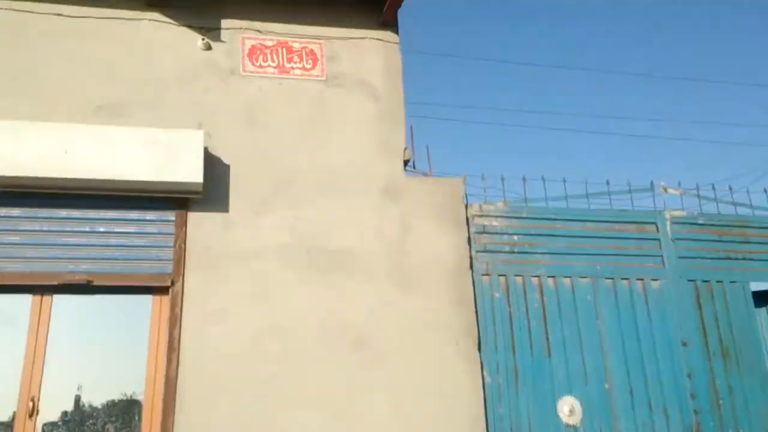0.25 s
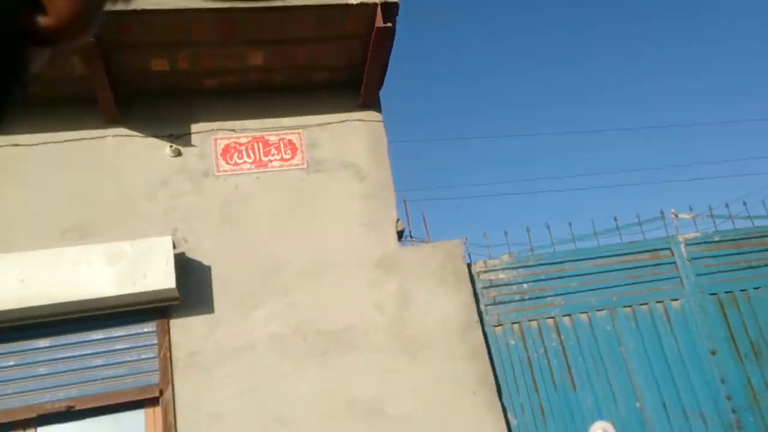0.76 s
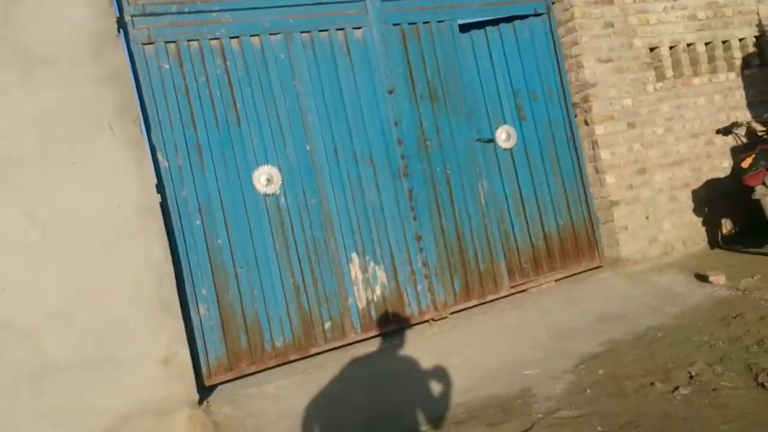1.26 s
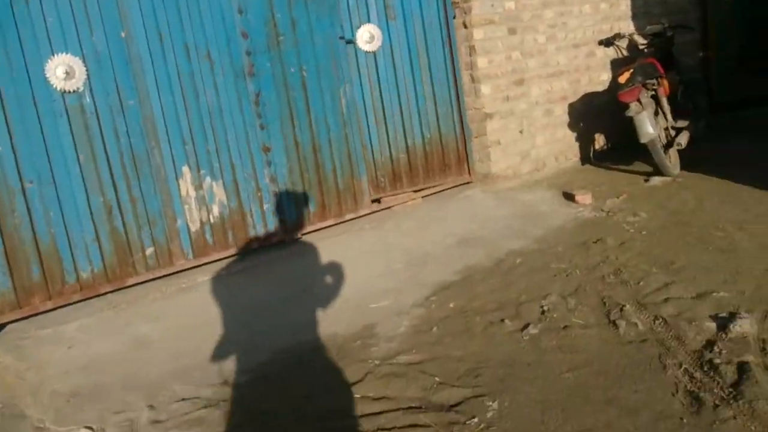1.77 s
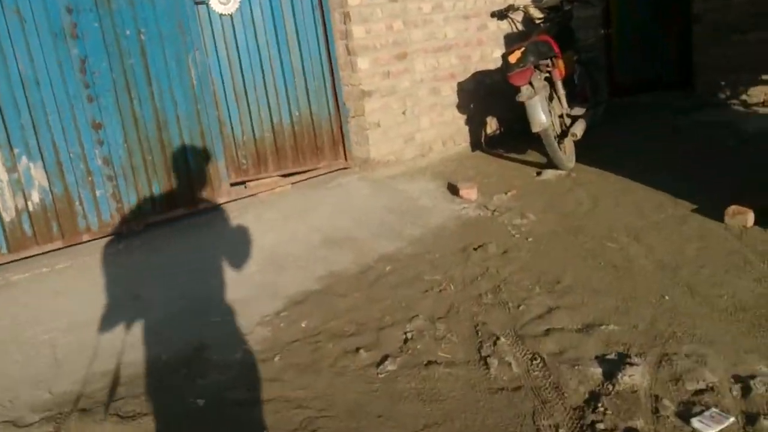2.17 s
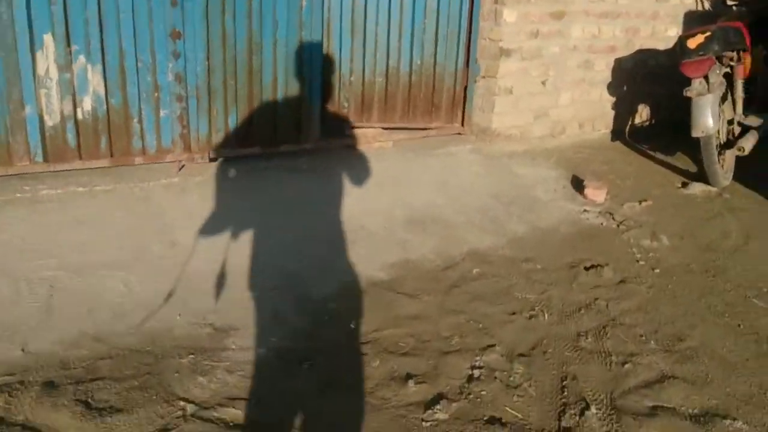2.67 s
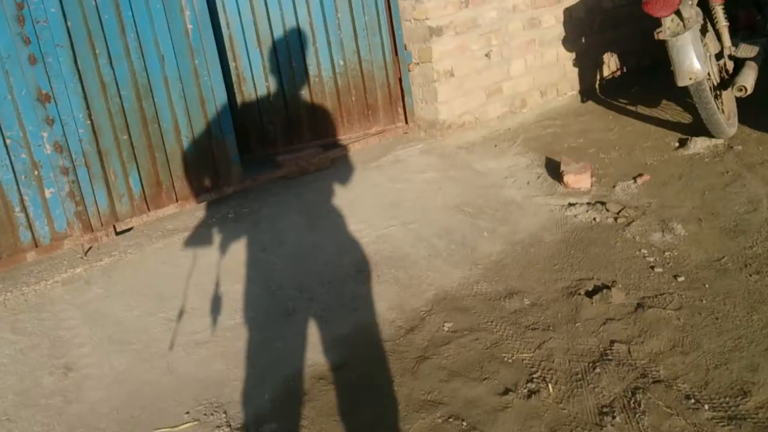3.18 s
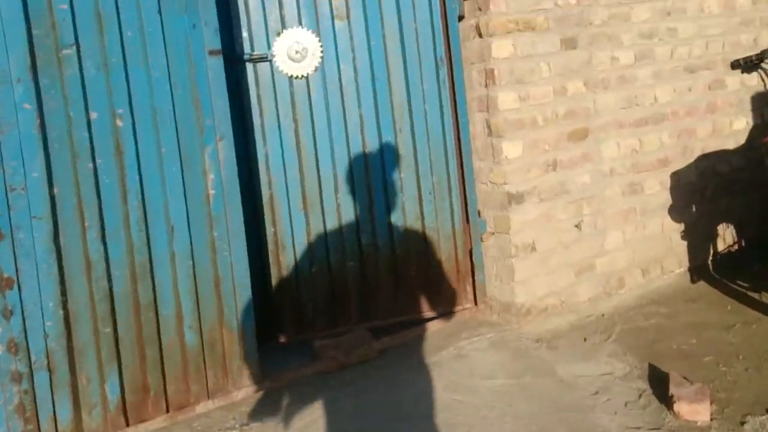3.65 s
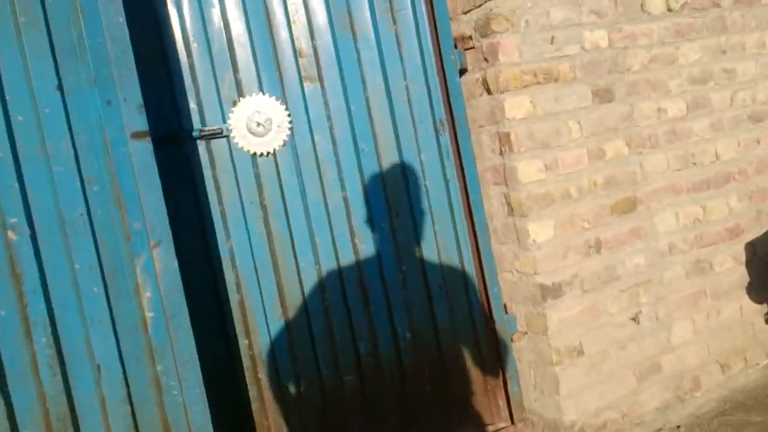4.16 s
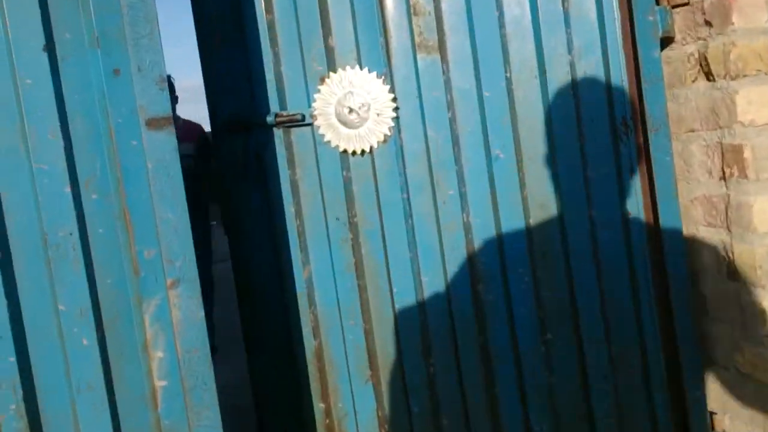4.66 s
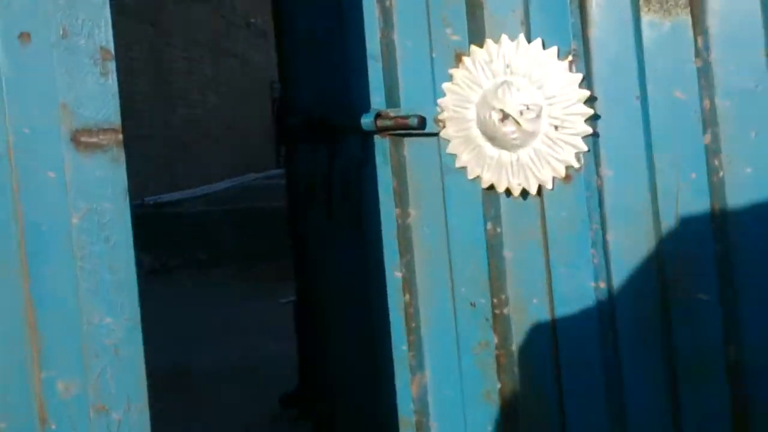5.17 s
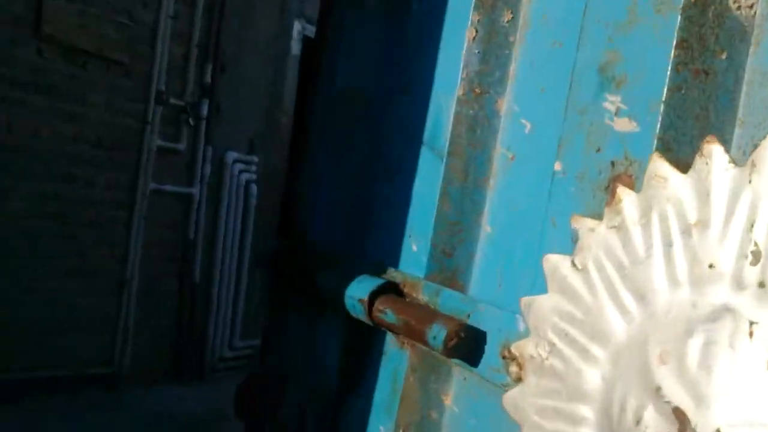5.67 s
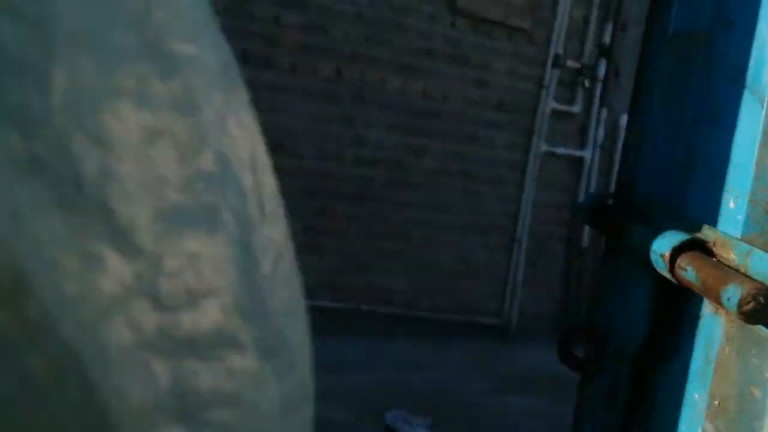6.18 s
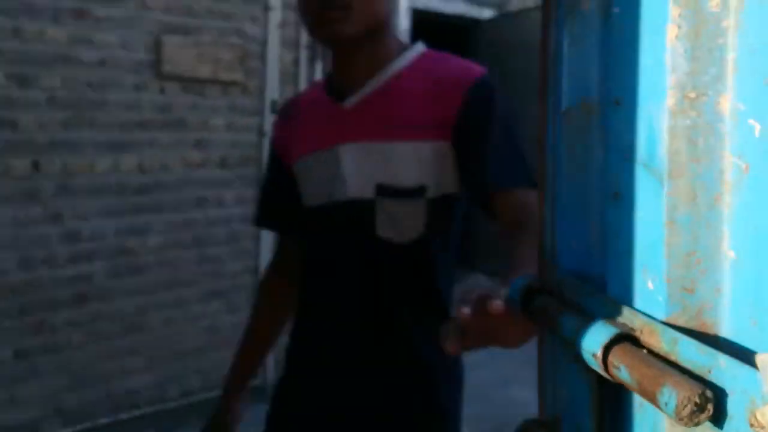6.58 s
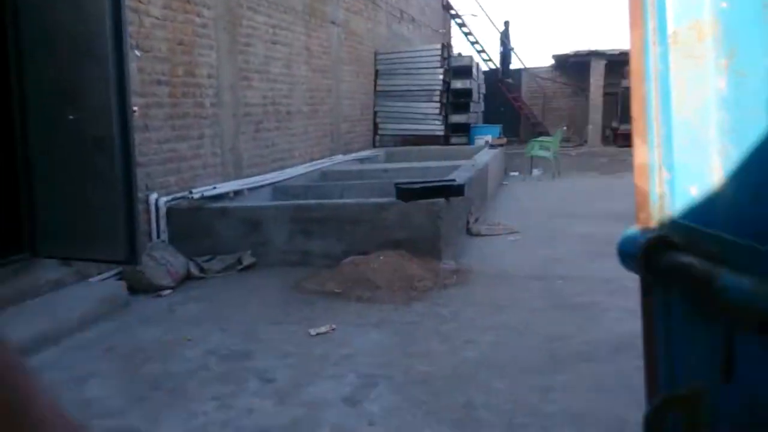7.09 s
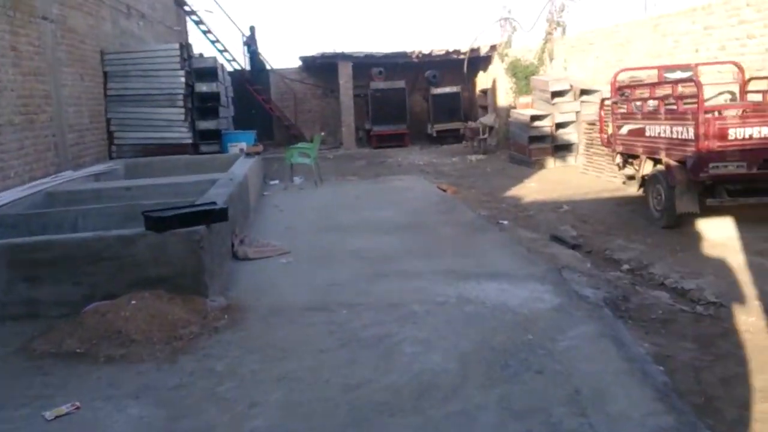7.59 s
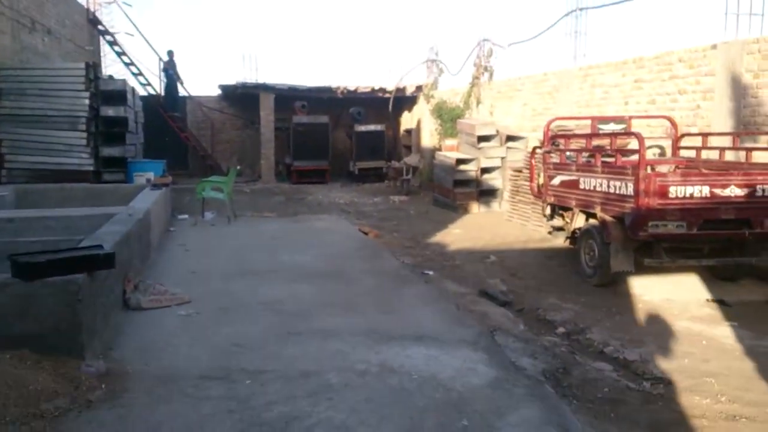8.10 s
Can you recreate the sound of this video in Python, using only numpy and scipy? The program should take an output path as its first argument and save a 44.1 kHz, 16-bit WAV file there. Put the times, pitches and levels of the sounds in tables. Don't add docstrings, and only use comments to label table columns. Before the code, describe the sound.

A multi-cylinder diesel runs steadily throughout, its quick uneven exhaust beats low and muffled behind a steel gate. From 0 to 0.5 s it is faint; fingers tap the phone case, loudest near 0.4, with fine sleeve rustle and soft wind buffeting mostly at left. Around 1.5 s there is a small rattle and heel thud; at 2.2 s a loud cloth flick with bright metallic jingle, then bumps. From 2.5 to 4.5 s the throb wavers with strides, with a sharp tick and rub at 3.8. From 4.7 to 5.5 s soles scrape and the exhaust gets stronger. At 6 s a heavy scuff and hard latch rattle hit, then a strong wind puff and deep thumps at 6.3, more scuffing until 6.9. After 7 s the phone clears the gate: clatter, hollow ringing pitches and fan hiss open out, loudest around 8 s, cutting off still running.

```python
import sys
import numpy as np
from scipy import signal
from scipy.fft import rfft, irfft, next_fast_len
from scipy.io import wavfile
from scipy.ndimage import uniform_filter1d

SR = 44100
rng = np.random.default_rng(int(sys.argv[2]) if len(sys.argv) > 2 else 0)


def file_out(sig):
    cols = np.atleast_2d(sig).T
    lim = np.clip(cols, -1, 1)
    pcm = np.round(lim * 32767).astype(np.int16)
    wavfile.write(sys.argv[1], SR, pcm)


def voltage_ratio(level):
    return 10 ** (np.asarray(level, float) / 20)


N = 367794

CYCLE_HZ = 12.69
PORT_LAG_S = 0.00025
THROB_LAG = 0.87
# t/s, lag/ms
CYCLE_LAG = [(0, 27.1), (3.3, 27.1), (3.7, 28.6), (5.7, 28.6), (6.3, 32.5), (7.3, 33.4), (8.34, 35.6)]
# t/s, heading left minus right/dB, palm over the left port/dB
PHONE_TURN = [(0, -16.5, 3), (.16, 9, 2), (.42, -10, 19), (.65, 3, 10), (1.11, 5, 23), (1.81, 5.5, 16),
              (2.37, 8.5, 23), (2.6, 5.5, 23), (3.32, 2, 13.5), (3.55, -5, 14), (3.95, -4, 16),
              (5.34, -1, 8), (5.87, -3.5, 6), (6.41, -5.5, 11), (7.55, 2, 5.5), (8.34, -1.5, 4)]
# f/Hz, level per Hz/dB
BLOCK_COLOUR = [(210, -36), (350, -10), (428, -26.5), (485, -3.5), (608, 4), (811, 6.5), (1000, 8.5),
                (1210, 2), (1660, -2.5), (2290, 2.5), (3140, -14), (4630, -9.5), (7000, -33), (9100, -26),
                (15400, -120)]
# t/s, echo delay/ms, echo share (0-1), line of sight through the gap/dB
GATE_PATH = [(0, 0.76, 0.7, -81), (.5, 0.57, 0.8, -100), (1.3, 0.61, 0.8, -76), (1.7, 0.61, 0.9, -81),
             (2.1, 0.64, 0.61, -94), (2.6, 0.53, 0.37, -81), (4.3, 0.6, 0.34, -55.5),
             (4.9, 0.67, 0.44, -47), (5.2, 0.77, 0.6, -44), (5.6, 1.63, 0.2, -36.5),
             (6.1, 0.67, 0.1, -40.5), (6.45, 1.19, 0.55, -34.5), (6.71, 0.12, 0, -41),
             (6.75, 0.33, 0, -35.5), (7.0, 0.6, 0, -29), (7.3, 0.15, 0.01, -23), (8.15, 0.14, 0.02, -21),
             (8.34, 0.35, 0.32, -26.5)]


def rms1(x):
    return x / np.sqrt(np.mean(x ** 2))


def curves(table):
    s, *columns = np.transpose(table)
    return [np.interp(np.arange(N) / SR, s, c) for c in columns]


def bumps(times, sizes, width_s):
    t = np.arange(0, N, 64) / SR
    bells = np.exp(-.5 * ((t[:, None] - times) / width_s) ** 2)
    return np.interp(np.arange(N) / SR, t, bells @ sizes)


def colour(x, points, lo_hz=0, hi_hz=30000):
    hz, db = np.transpose(points)
    size = next_fast_len(N)
    f = np.fft.rfftfreq(size, 1 / SR) + 1
    gain = voltage_ratio(np.interp(np.log(f), np.log(hz), db))
    gain = gain / (1 + (lo_hz / f) ** 10) / (1 + (f / hi_hz) ** 10)
    return rms1(irfft(rfft(x, size) * gain, size)[..., :N])


def ring(x, hz, width):
    return signal.lfilter(*signal.iirpeak(hz, hz / width, SR), x)


def delay(x, seconds):
    return np.interp(np.arange(N) - seconds * SR, np.arange(N), x)


def patchy(x, db, size=1024):
    z = signal.stft(x, nperseg=size)[2]
    field = uniform_filter1d(rng.standard_normal(z.shape), size=6, axis=-2, mode="wrap")
    field = uniform_filter1d(field, size=4, axis=-1, mode="wrap")
    return signal.istft(z * voltage_ratio(db * rms1(field)), nperseg=size)[1][..., :N]


def chatter(db, per_s=40):
    size = int(SR / per_s)
    smooth = uniform_filter1d(rng.standard_normal(N), size=size)
    return voltage_ratio(db * rms1(uniform_filter1d(smooth, size=size)))


def pan(db):
    return voltage_ratio(np.array([db, -db]) / 2) / np.cosh(db * np.log(10) / 40)


def ports(direct, diffuse, share, lag_s=PORT_LAG_S):
    share = np.clip(share, 0, 1)
    both = np.array([direct, delay(direct, lag_s)])
    return np.sqrt(1 - share) * both + np.sqrt(share) * diffuse


def echoed(x):
    echo_ms, echo = curves(GATE_PATH)[:2]
    share = np.clip(echo, 0, 1)
    return np.array([c + share * delay(c, echo_ms / 1000) for c in x]) / np.sqrt(1 + echo ** 2)


def throb(lag):
    cycles = CYCLE_HZ * (np.arange(N) / SR - curves(CYCLE_LAG)[0] / 1000)
    return np.cos(2 * np.pi * (cycles - lag))


def levels():
    # t/s, block level/dB, exhaust level/dB, shade of the walker's body/dB
    approach = [(0, -42.5, -34.5, 45), (.3, -37, -36.5, 51), (.5, -35, -46, 34), (1.25, -37.5, -21, 27.5),
                (1.6, -33.5, -32.5, 17), (2.3, -33.5, -31, 7.5), (3.1, -33.5, -29.5, 4.5),
                (3.8, -33, -33, -1.5), (4.25, -33.5, -24, 3.5), (4.7, -31, -26, 4.5),
                (5.2, -29.5, -12, 5.5), (5.6, -28, -9, 5.5), (6.2, -26.5, -11, 5), (6.8, -27.5, -17.5, 3.5),
                (7.1, -24, -16.5, 2), (7.45, -20.5, -16, 1), (8, -15.5, -14.5, 4),
                (8.34, -17.5, -17.5, 1.5)]
    # t/s, swell of pipe/dB, of firing tone/dB, of silencer/dB
    strides = [(.25, 15, 8, 4.5), (1.2, -11.5, -10, -1), (1.68, 4, 7.5, -3), (2.28, 7.5, -10.5, 11.5),
               (2.791, 4.5, -1, 7), (3.319, 7, 9.5, 6), (3.85, 11.5, 11.5, 5), (4.5, 6.5, -10, 4.5),
               (4.74, 5, -14, 1), (4.95, -1.5, 5, 5), (5.43, -3, 0, -2), (6.201, 3.5, 11, 0),
               (6.55, 10.5, 10, 4.5), (6.97, 9.5, -9, 4.5), (7.4, 0, 9.5, -5.5), (8.08, -1.5, -1, -2)]
    stride_s = 0.12
    block_db, exhaust_db, shade_db = curves(approach)
    s, pipe_swell, tone_swell, silencer_swell = np.transpose(strides)
    swell = bumps(s, pipe_swell, stride_s)
    sight_db = curves(GATE_PATH)[2]
    return dict(
        rumble=block_db + 0.34 * swell,
        clatter=block_db + 7.5 + 0.19 * sight_db - 0.0074 * shade_db,
        hiss=block_db - shade_db,
        pipe=exhaust_db + swell,
        tone=-24.5 + 0.24 * exhaust_db + bumps(s, tone_swell, stride_s),
        silencer=-8.5 + 0.5 * block_db + 0.22 * exhaust_db + bumps(s, silencer_swell, stride_s))


def self_noise():
    cavity = [(5000, -21), (7800, -11), (10000, 3), (12000, -12), (15400, -13)]  # f/Hz, level/dB
    return voltage_ratio(-75.5) * colour(rng.standard_normal((2, N)), cavity)


def wind():
    # t/s, peak/dB, left minus right/dB
    puffs = [(.37, -27, 1), (.64, -31, 27), (.97, -27, 24), (1.21, -36, 3), (1.411, -30.5, 21),
             (1.6, -27, 6), (2.13, -23.5, 29), (2.6, -23, 4), (2.77, -27.5, 13), (3.41, -26, 18),
             (3.83, -27.5, 18.5), (4.09, -29, -16), (4.46, -36, 8), (4.88, -35, 5), (5.3, -36, 5),
             (5.46, -32, 26), (5.85, -29.5, 0), (6.14, -37, 12), (6.28, -11.5, 16), (6.53, -32, 20),
             (6.97, -20, -24), (7.23, -19, -6), (7.42, -22.5, -14), (8.05, -31, -6)]
    # f/Hz, level per Hz/dB
    gust = [(4, 9), (10, 23.5), (25, 12), (50, 12), (100, 18), (250, 3.5), (600, -53.5)]
    s, db, pan_db = np.transpose(puffs)
    breeze = voltage_ratio(-34) * pan(20.5)[:, None]
    gain = breeze + [bumps(s, g, 0.09) for g in voltage_ratio(db) * pan(pan_db)]
    air = patchy(rng.standard_normal((2, N)), db=5.2, size=2048)
    return voltage_ratio(2.1) * gain * colour(air, gust, lo_hz=6)


def brushes():
    # end t/s, length/s, level/dB, left minus right/dB
    strokes = [
        (.23, .07, -51.5, 25),
        (.33, 0.068, -66, 14),
        (.49, .06, -49, 17),
        (.65, .07, -63, 15),
        (.78, .015, -64, 14),
        (1.03, .08, -62, 13),
        (1.47, .07, -60, 4.5),
    ]
    # f/Hz, level per Hz/dB
    sleeve = [(4000, -25), (5500, -7), (7300, -13), (9500, 1.5), (12500, -5), (15400, -3)]
    t, gain = np.arange(N) / SR, np.zeros((2, N))
    for end, length, db, pan_db in strokes:
        start = 1 / (1 + np.exp(-np.clip((t - end + length) / .006, -50, 50)))
        slope_db = 40 * np.minimum(t - end, 0) - 900 * np.maximum(t - end, 0)
        gain += voltage_ratio(db + slope_db) * start * pan(pan_db)[:, None]
    return gain * colour(rng.standard_normal((2, N)), sleeve)


def scuffs():
    # t/s, level/dB, share of sole/dB, left minus right/dB
    flicks = [
        (0.87, -43, -25, 14.5),
        (1.473, -32, 0, 5),
        (1.735, -41, -7, -40),
        (2.201, -5.5, -3, 1.5),
        (4.702, -28, 9, -4),
        (4.912, -33.5, 15.5, -7),
        (5.04, -32, 4.5, -29),
        (5.482, -15, 1.5, -11),
        (6.427, -21, -4, -9),
        (6.723, -20, 8.5, -9),
    ]
    # t/s, level/dB, share of sole/dB, left minus right/dB
    rubs = [(1.466, -33, -5.5, -4), (1.846, -49.5, 8, -13), (2.072, -46, 5.5, 4), (2.6794, -48.5, 4, 2),
            (3.263, -54.5, 17, 9), (3.705, -53.5, 19, -18), (3.798, -29, -4, -21), (5.226, -26, -7, -32),
            (5.73, -21.5, 1, -14), (5.999, -5, -2.5, -12), (6.288, -25, 6.5, -13), (6.77, -40, -11, -13),
            (6.852, -13, 0.5, -8.5)]
    # f/Hz, level per Hz/dB
    cloth_right = [(2940, -33), (5000, -24), (5950, 16.5), (7450, 8.5), (7990, 9.5), (10800, 12.5),
                   (12300, -5.5), (15400, -6)]
    cloth_left = [(4000, -36), (5500, -14.5), (7500, -12), (9300, -7.5), (11000, -16), (13000, -20),
                  (15400, -15.5)]
    sole_right = [(500, -4), (1000, 2), (1600, 2.5), (2500, 8), (3300, -5.5), (4300, 15), (5500, 6.5),
                  (7000, -46.5)]
    sole_left = [(500, -14), (1000, -22), (1600, -12.5), (2500, -1), (3300, -8), (4300, -10), (5500, -18),
                 (7000, -35.5)]
    top, body = np.zeros((2, 2, N))
    rows = [(*r, 0.0091, 0.25) for r in flicks]  # hold/s, t60/s
    rows += [(*r, 0.068, 0.26) for r in rubs]
    for s, db, body_db, pan_db, hold, t60 in rows:
        first = int(s * SR)
        t = np.arange(N - first)[:SR // 2] / SR
        fade = voltage_ratio(-60 * np.maximum(t - hold, 0) / t60)
        shape = (1 - np.exp(-t / .007)) * fade * pan(pan_db)[:, None]
        top[:, first:][:, :len(t)] += voltage_ratio(db - 12.5) * shape
        body[:, first:][:, :len(t)] += voltage_ratio(db + body_db - 3.5) * shape
    rub = ports(rng.standard_normal(N), rng.standard_normal((2, N)), .4)
    left, right = patchy(rub, db=3.2, size=512)
    cloth = [colour(left, cloth_left), colour(right, cloth_right, lo_hz=4750)]
    sole = [colour(left, sole_left), colour(right, sole_right)]
    return top * cloth + body * sole


def clinks():
    # t/s, peak/dB, f/Hz, t60/s
    rattles = [(1.482, -20, 1600, 0.03), (1.474, -22, 1950, .04), (1.476, -28, 2680, 0.067),
               (1.48, -25, 1020, 0.17), (2.197, -16, 2580, 0.12), (2.212, -7.5, 4300, 0.048),
               (2.208, -10, 8300, 0.069), (2.204, -16, 11400, 0.2), (2.205, -25.5, 14600, .15),
               (2.211, -18, 9700, .1), (2.21, -17, 7000, .12), (2.225, -17, 1520, 0.21),
               (2.235, -22, 1100, 0.18), (2.255, -24, 1500, .03), (2.277, -24, 1450, .03),
               (2.298, -26, 1480, .05), (1.493, -24, 1650, .03), (2.23, -24.5, 680, 0.3),
               (6.011, -4, 3970, 0.037), (6.049, -10, 3900, 0.096), (6.089, -24, 4250, 0.088)]
    out = np.zeros((2, N))
    for s, db, hz, t60 in rattles:
        t = np.arange(int(t60 * SR)) / SR
        width = 7 * np.sqrt(hz)
        noise = rng.standard_normal((2, SR // 2))
        rattle = rms1(ring(ring(noise, hz, width), hz, width))[:, -len(t):]
        fade = voltage_ratio(db - 60 * t / t60) * (1 - np.exp(-t / 0.0018))
        out[:, int(s * SR):][:, :len(t)] += fade * rattle
    return out


def knocks():
    # t/s, upper peak/dB, lower minus upper/dB, left minus right/dB
    ticks = [(0.401, -47, -9, -15), (0.8769, -52, -3, 7), (1.734, -29.5, -26, -38), (1.7858, -45, -12, -30),
             (1.8144, -54, -2, -14), (1.8572, -36.5, 12.5, -32), (2.204, -20, -4.5, 1),
             (3.7987, -11.5, -40, -35), (4.711, -37, 3, 4), (5.493, -25, 10.5, -16), (5.8077, -35, -3, -6),
             (6.115, -20, 7, -24), (6.3615, -12.5, -9, 16), (6.5934, -47, 12, -16), (6.6718, -47, 2, -17),
             (6.736, -24, 9, -15), (5.252, -31, -8, -15), (5.295, -32, -5, -15), (5.76, -38, 8, -10),
             (6.312, -33, 0, -10), (6.432, -33, 0, -10), (6.62, -50, 0, -15), (7.385, -32, 8, -8),
             (7.4, -23, 14, -8), (1.016, -58, -10, 14), (.862, -64, 8, 10), (6.852, -32, 8, -7)]
    # t/s, peak/dB, f/Hz
    taps = [
        (0.3121, -7.5, 900),
        (.321, -15, 920),
        (0.369, -10, 690),
        (.393, -3.5, 402),
        (0.3998, -6.5, 910),
        (.4, -19.5, 2960),
        (.477, -24, 750),
    ]
    # t/s, peak/dB, f/Hz, t60/s
    thuds = [
        (1.563, -16.5, 176, 0.045),
        (2.23, -25.5, 352, 0.56),
        (2.269, -9.5, 150, 0.051),
        (2.312, -16, 274, 0.082),
        (2.739, -17.5, 152.6, 0.2),
        (3.849, -19.5, 151, 0.13),
        (1.853, -19, 200, 0.026),
        (5.075, -18, 327, 0.097),
        (6.105, -20, 44.3, 0.38),
        (6.362, -19, 43.6, 0.24),
    ]
    tick_cycles, blow_cycles = 2.8, .55
    rows = []
    for hz, rel_db in ((10070, -0.5), (7200, -6.0), (13800, -23.0), (5500, -7.0)):
        rows += [(s, db + rel_db, hz, .0045, p, tick_cycles) for s, db, _, p in ticks]
    rows += [(s + 0.001027, db + rel_db, 4200, .009, p, tick_cycles) for s, db, rel_db, p in ticks]
    rows += [(s, db, hz, 2.5 / hz, -22, blow_cycles) for s, db, hz in taps]
    rows += [(s, db, hz, t60, -1.5, blow_cycles) for s, db, hz, t60 in thuds]
    out = np.zeros((2, N))
    for s, db, hz, t60, pan_db, cycles in rows:
        t = np.arange(int(t60 * SR)) / SR
        contact = np.sin(np.pi / 2 * np.minimum(t * hz / cycles, 1)) ** 2
        blow = voltage_ratio(db + 10.0 - 60 * t / t60) * contact * np.sin(2 * np.pi * hz * t)
        out[:, int(s * SR):][:, :len(t)] += blow * pan(pan_db)[:, None]
    return out


def standing_waves():
    hums = [(1.097, 0.46, -42, 980, 130), (0.039, 0.3, -44.5, 905, 200), (.72, 0.24, -48, 1190, 100),
            (2.42, 0.16, -41, 2660, 200), (6.084, .55, -31, 338.6, 35), (6.67, 0.17, -30.5, 863, 70),
            (6.029, 0.27, -28, 960, 50), (0, .25, -55, 1980, 500), (1.594, .15, -47, 2140, 200),
            (2.901, .45, -30.5, 329, 25), (2.709, 1.31, -39, 956, 45.3), (5.549, .3, -30, 963, 45),
            (2.75, .3, -49, 1940, 90), (3.26, 0.067, -48, 2150, 200), (3.375, 0.21, -42, 1615, 70),
            (3.519, .55, -38, 2600, 170), (3.768, .18, -41, 1734, 60), (4.2, .2, -42, 1474, 60),
            (2.455, .2, -33.5, 407, 70.3), (3.951, .6, -31, 430, 71.6), (4.65, .45, -33, 333.3, 30),
            (4.88, 0.12, -33.5, 461, 50), (4.993, .27, -31, 1360, 170), (5.027, 0.23, -34.5, 1040, 200),
            (5.43, .1, -28, 1206, 140), (5.425, .12, -34, 1390, 80), (5.454, 0.25, -30.5, 610, 60),
            (6.6, .6, -29.5, 1458, 70), (6.6, .6, -26.5, 503, 40), (6.698, .4, -32.5, 654, 120),
            (7.111, .1, -28, 1048, 90), (7.259, .42, -23.5, 727, 110), (7.272, 0.77, -22.5, 806, 70.5),
            (7.56, 0.12, -32, 2250, 130), (7.9, .5, -34, 331.5, 40), (7.85, 0.52, -23.5, 1193, 109),
            (7.912, .3, -42.5, 2390, 152), (0.548, .2, -46, 630, 80), (1.45, 0.16, -37, 460, 83)]
    out = np.zeros((2, N))
    beat = throb(THROB_LAG)
    for s, length, db, hz, width in hums:
        near = slice(int(max(s - .4, 0) * SR), int((s + length + .4) * SR))
        t = np.arange(N)[near] / SR
        noise = rng.standard_normal(3 * SR)
        hum = rms1(ring(ring(noise, hz, width), hz, width))[-len(t):]
        throb_db = 7 * beat[near] / (1 + (hz / 550) ** 4)
        outside_s = np.maximum(0, np.maximum(s - t, t - s - length))
        gain = voltage_ratio(db + throb_db) * np.exp(-outside_s / 0.054)
        out[:, near] += gain * [hum, np.roll(hum, int(PORT_LAG_S * SR))]
    return out


def shell_sings():
    tones = [(4.694, 0.026, -20, 329), (4.955, 0.013, -14.5, 330), (4.993, 0.011, -15.5, 335),
             (5.321, 0.016, -23.5, 345), (6.34, 0.024, -13.5, 339), (6.56, 0.039, -16, 329.4),
             (6.62, .02, -19.5, 330), (7.555, 0.017, -13.5, 211), (7.771, 0.04, -13, 333.4),
             (8.022, 0.023, -16, 272), (8.083, 0.015, -16, 339), (8.123, 0.02, -14.5, 280),
             (8.174, 0.029, -17.5, 349), (8.3, 0.028, -14, 338), (2.35, 0.011, -15, 288),
             (2.428, .01, -16, 230), (1.61, 0.018, -20, 105), (6.265, 0.0087, -7.5, 150),
             (6.315, 0.015, -9, 200), (4.935, 0.0086, -10.5, 162), (5.012, .009, -9, 167),
             (4.46, .009, -10.5, 160)]
    out = np.zeros(N)
    for s, half, db, hz in tones:
        near = slice(int((s - .2) * SR), int((s + .2) * SR))
        t = np.arange(N)[near] / SR - s
        out[near] += voltage_ratio(db) * np.exp(-.5 * (t / half) ** 2) * np.sin(2 * np.pi * hz * t)
    return np.array([out, delay(out, PORT_LAG_S)])


def fan():
    heading, palm = curves(PHONE_TURN)
    air = patchy(ports(rng.standard_normal(N), rng.standard_normal((2, N)), .7), db=2.6)
    air = chatter(db=1.75) * (air + 0.8 * ring(air, 3540., 40.) + 0.07 * ring(air, 4200.0, 770.0))
    hiss = colour(air, BLOCK_COLOUR, lo_hz=3450, hi_hz=6000)
    return voltage_ratio(levels()["hiss"] + 2.5) * pan(heading - palm) * hiss


def block(cycles, diffuse, lag_s):
    # f/Hz, width/Hz, level/dB
    covers = [(458, 190, 0.5), (658, 7.3, -6), (796, 13, -2.5), (503, 13, 6.5), (1099, 8.1, -1.5),
              (1177, 18, -2), (1348, 10, -2.5), (1490, 19, 2), (1710, 35, -30), (2148, 20, -7),
              (2279, 23, -1), (2480, 26, 2), (3340, 53, -2)]
    turn = rng.standard_normal(3476)
    repeat = np.interp(cycles % 1, np.arange(len(turn)) / len(turn), turn)
    gate = 1 + 0.5 * np.exp(-(6 * cycles % 1) / 0.19)
    direct = gate * (.45 * repeat + rng.standard_normal(N))
    direct = patchy(direct, db=2.2, size=8192)
    both = ports(rms1(direct), rng.standard_normal((2, N)), diffuse, lag_s)
    rung = sum(voltage_ratio(db) * ring(both, hz, w) for hz, w, db in covers)
    return patchy(both + 1.2 * rung, db=3.5)


def exhaust(cycles):
    firings_db = [-1.4, 0, -3.4, -5.3, -4.6, -6.9]
    runners_ms = [1.2, 2.7, .6, 1.9, 0, -2.7]
    # f/Hz, width/Hz, level/dB, sign
    pipe_modes = [(82, 19, -26, -1), (125.5, 50, -5.5, -1), (140, 80, -5.7, 1), (180, 38, -15, -1)]
    # f/Hz, width/Hz, level/dB
    silencer_modes = [(274, 98, -5.5), (329.2, 19.4, 9), (427, 100, 2.5)]
    # f/Hz, level/dB
    boom = [(40, 7), (100, 2.5), (160, 3), (192, 8), (240, 2)]
    count = np.arange(int(6 * cycles[-1]))
    late, strong = rng.standard_normal((len(count), 2)).T
    at = np.interp(count / 6, cycles, np.arange(N))
    at = at + (np.take(runners_ms, count % 6) + .15 * late) * SR / 1000
    pulses = np.zeros(N)
    pulses[np.clip(at, 0, N - 1).astype(int)] = voltage_ratio(np.take(firings_db, count % 6) + 1.3 * strong)
    pulses = signal.sosfilt(signal.butter(4, 900, fs=SR, output="sos"), pulses)
    pipe_db, tone_db, silencer_db = map(levels().get, ("pipe", "tone", "silencer"))

    pipe = sum(sign * voltage_ratio(db) * ring(pulses, hz, w) for hz, w, db, sign in pipe_modes)
    pipe = colour(pipe, boom, hi_hz=227.0)
    pipe_throb = 1.5 * throb(0.14) * (0.5 - bumps([6.35], [1], .3))
    tone = rms1(ring(ring(pulses, 6 * CYCLE_HZ, 15.0), 6 * CYCLE_HZ, 14.0))

    outflow = [(60, 4), (150, 11.0), (330, -7.5), (500, -8.0), (900, -45.0)]  # f/Hz, level/dB
    gas = colour(rng.standard_normal(N), outflow)
    shell = rms1(sum(voltage_ratio(db) * ring(pulses + 0.028 * gas, hz, w) for hz, w, db in silencer_modes))
    shell = colour(shell, boom, lo_hz=204, hi_hz=560) + 0.4 * gas
    shell = voltage_ratio(silencer_db + 1) * patchy(shell, db=1.6, size=2048)

    mono = voltage_ratio(pipe_db - 2.5 + pipe_throb) * pipe + voltage_ratio(tone_db - 4.0) * tone
    mono = mono + voltage_ratio(0.5 * throb(THROB_LAG) - 1.4) * echoed([shell])[0]
    yard = voltage_ratio(silencer_db - 11.5) * colour(rng.standard_normal((2, N)), boom, lo_hz=208, hi_hz=600)
    return np.array([mono, delay(mono, PORT_LAG_S)]) * pan(-2.0)[:, None] + yard


def engine():
    # f/Hz, level per Hz/dB
    treble = [(3530, 27.5), (6000, 9), (7570, -13), (10200, -30.5), (12300, -53), (14400, -55),
              (15400, -58.5)]
    cycles = CYCLE_HZ * (np.arange(N) / SR - curves(CYCLE_LAG)[0] / 1000) + 1
    rumble_db, clatter_db = map(levels().get, ("rumble", "clatter"))
    heading, palm = curves(PHONE_TURN)
    sight_db = curves(GATE_PATH)[2]
    low = block(cycles, diffuse=0.15, lag_s=0.00016)
    high = block(cycles, diffuse=0.71, lag_s=PORT_LAG_S)
    rumble = colour(low, BLOCK_COLOUR, lo_hz=436, hi_hz=950)
    rumble = voltage_ratio(rumble_db + 1.0) * pan(0.063 * heading - 0.27 * palm) * rumble
    clatter = colour(high, BLOCK_COLOUR, lo_hz=1060, hi_hz=2760)
    clatter = voltage_ratio(clatter_db) * pan(0.94 * heading) * clatter
    top = voltage_ratio(0.5 * (sight_db + 6.0)) * colour(high, treble, lo_hz=10740)
    sight = colour(high, treble, lo_hz=5200, hi_hz=10770) + top
    sight = sight + colour(high, BLOCK_COLOUR, lo_hz=2830, hi_hz=3480)
    return exhaust(cycles) + echoed(rumble + clatter) + voltage_ratio(sight_db) * pan(-5.0)[:, None] * sight


def scene():
    handling = brushes() + scuffs() + clinks() + knocks()
    machine = standing_waves() + shell_sings() + fan() + engine()
    return self_noise() + wind() + handling + machine


def band_limit(x):
    return signal.sosfilt(signal.butter(12, 15300, fs=SR, output="sos"), x)


def record(dry):
    knee = 18
    mix = dry / (1 + np.abs(dry) ** knee) ** (1 / knee)
    return band_limit(mix)


dry = scene()
out = record(dry)
file_out(out)
```